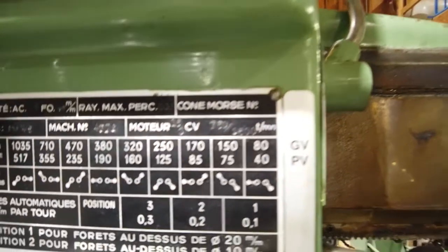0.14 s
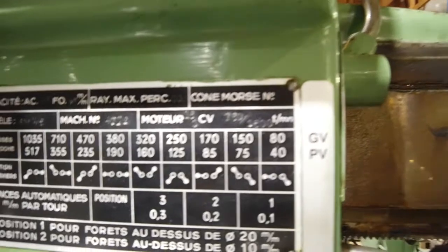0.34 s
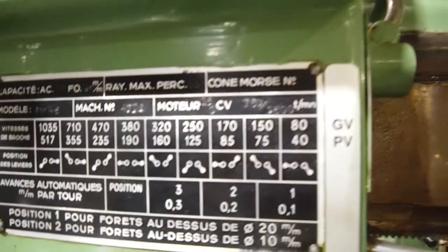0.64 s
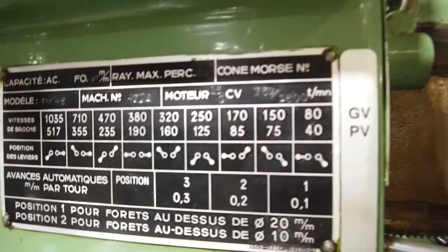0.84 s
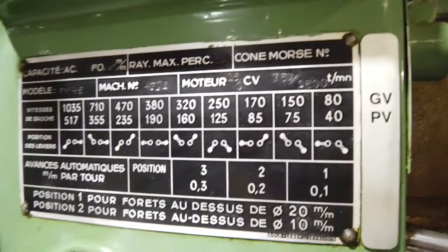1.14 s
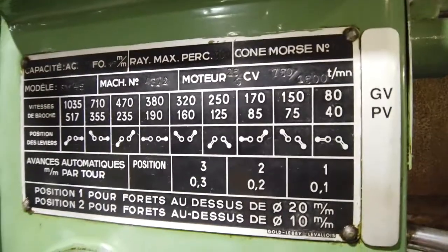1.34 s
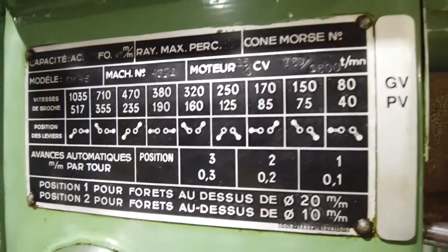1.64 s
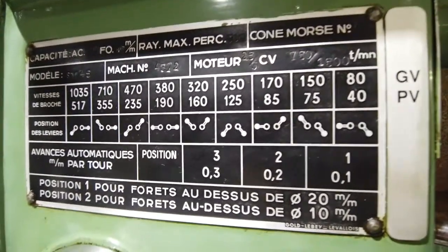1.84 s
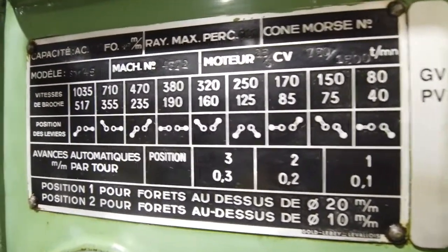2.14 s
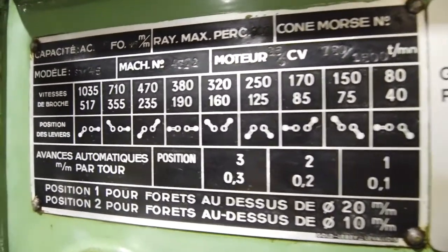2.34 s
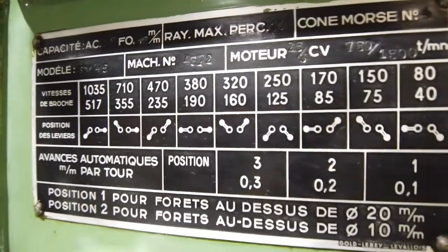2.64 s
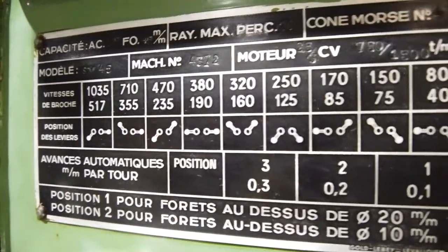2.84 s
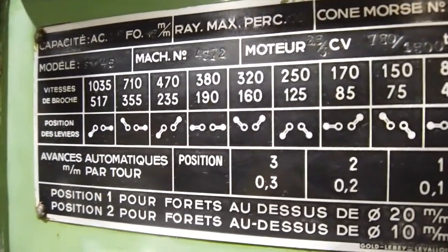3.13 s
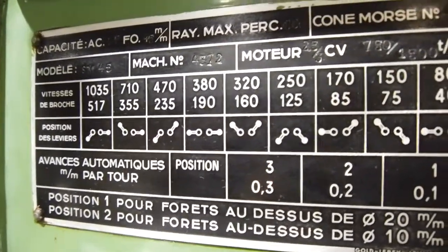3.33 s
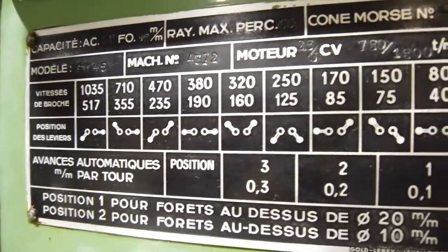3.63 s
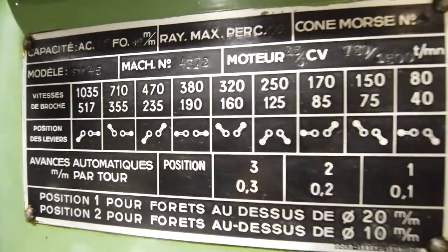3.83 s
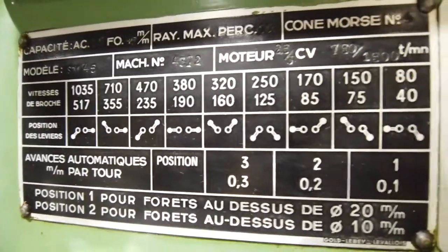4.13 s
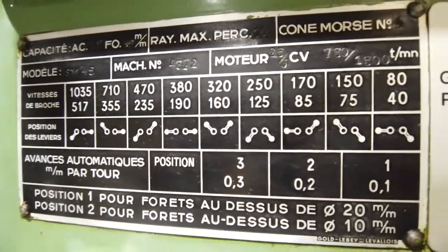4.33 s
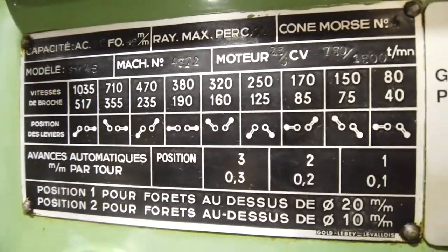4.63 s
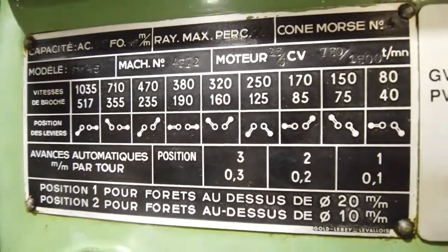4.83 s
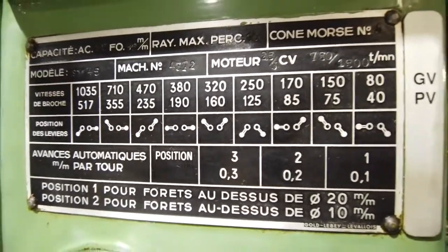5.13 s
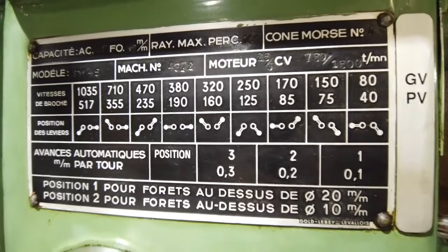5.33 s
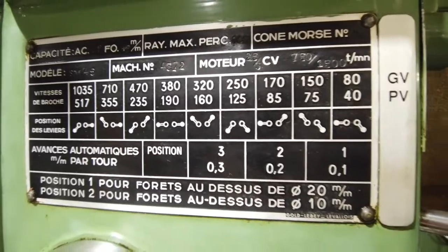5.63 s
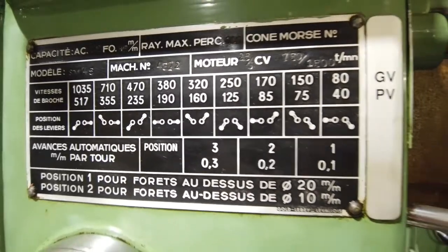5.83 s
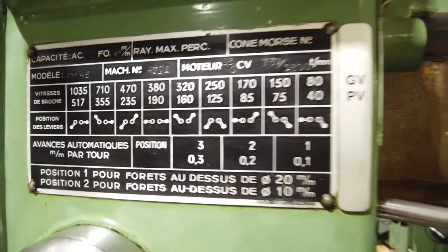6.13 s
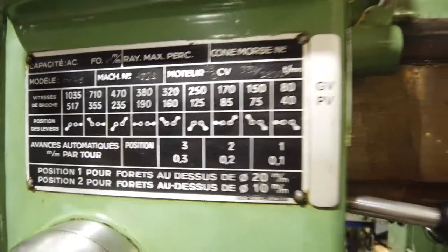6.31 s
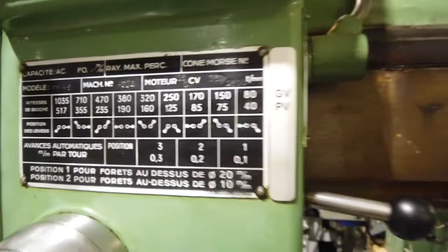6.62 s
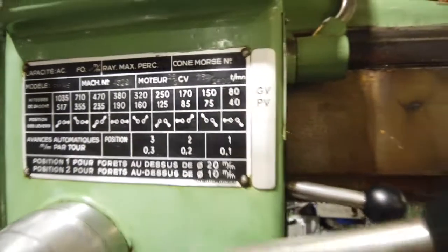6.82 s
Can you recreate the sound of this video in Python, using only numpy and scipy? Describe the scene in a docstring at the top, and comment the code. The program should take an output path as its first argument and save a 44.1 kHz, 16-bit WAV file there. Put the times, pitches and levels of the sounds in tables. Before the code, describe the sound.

A large drill's motor and gearbox idle with a steady whine, light gear clatter and a low hum in a machine shop.

```python
"""A machine shop, close to the head of an idling radial drill; a two-port stereo microphone drifts
from beside the head to its front and part way back. The motor pinion's meshing teeth whine on top.
Loose gear teeth clatter in the cast housing in time with the shafts, the bearings ring and fizz,
and a dry spot squeaks. Underneath, a resonance of the arm throbs unevenly, about five times
a second, over the rumble of the hall."""
import sys
import numpy as np
from scipy import signal
from scipy.fft import rfft, irfft, next_fast_len
from scipy.io import wavfile
from scipy.ndimage import uniform_filter1d

SR = 44100
rng = np.random.default_rng(int(sys.argv[2]) if len(sys.argv) > 2 else 0)


def bounce(signal):
    """Save signal as a 16-bit WAV file at the path given by the first command-line argument."""
    frames = np.transpose(np.atleast_2d(signal))
    limited = np.clip(frames, -1, 1)
    pcm = np.round(limited * 32767).astype(np.int16)
    wavfile.write(sys.argv[1], SR, pcm)


N = 307377
T = np.arange(N) / SR
COARSE_T = T[::64]
FFT_SIZE = next_fast_len(N)
BINS = np.fft.rfftfreq(FFT_SIZE, 1 / SR)

MOTOR_HZ, COUNTERSHAFT_HZ, SPINDLE_HZ = 24.755, 22.25, 2.949
SLOW_SHAFT_HZ, IDLER_HZ = MOTOR_HZ / 5, MOTOR_HZ / 10

# The microphone's path round the head: (time [s], position [0 beside, 1 in front])
MIC_PATH = [(0, 0.03), (1.9, 0.18), (2.6, 0.53), (3.1, 0.9), (4.1, 1), (4.7, 0.64), (5.6, 0.39),
            (6.97, 0.37)]
# How its two ports relate: (frequency [Hz], likeness [0-1], left lead [rad])
MIC_PORTS = [(30, .95, 0), (200, .97, 0), (280, .94, 0), (420, .985, 0), (510, .94, 0), (700, .975, 0),
             (1180, .935, -.05), (1340, .98, -.05), (1700, .93, 0), (2050, .965, .05), (2380, .75, .1),
             (2500, .87, .1), (2680, .6, 0), (3000, .28, -.5), (3300, .2, 2.2), (3500, .7, 3),
             (3850, .78, 3.1), (4700, .15, 3.3), (5500, .68, 4.6), (6400, .25, 5.7), (7400, .25, 4.6),
             (9000, .25, 6.1), (13000, .25, 9.3)]
# Relative pickup of the gearing along that path:
# (time [s], whine [dB], low housing modes [dB], high housing modes [dB], wheels [dB], covers [dB])
GEAR_PICKUP = [(0, -28.5, -33.5, -32, -28.5, -38.5), (0.6, -30, -34.5, -33.5, -30, -41),
               (0.88, -29.5, -35, -34, -28, -39), (1.05, -29.5, -35, -33, -33, -41.5),
               (1.2, -29.0, -34.5, -34, -29.5, -42), (2.0, -29.5, -34.5, -34.5, -31, -44.5),
               (2.55, -29, -34.5, -35, -31, -43), (2.95, -30.5, -36.5, -32, -32, -42.5),
               (3.15, -29, -35.5, -34, -31, -38), (3.35, -29.5, -34, -33, -32.5, -42),
               (3.8, -29, -35.5, -33.5, -32.5, -38.5), (4.0, -29, -35.5, -35, -31, -39.5),
               (4.15, -30, -35.5, -34, -29, -44), (4.65, -30.5, -36, -34, -33, -43.5),
               (5.05, -31, -34.5, -35.5, -32.0, -43), (5.65, -30.5, -35.5, -36.5, -31.5, -45),
               (6.3, -32.5, -36.5, -37, -32.5, -46.5), (6.97, -33.5, -38, -44, -35, -44.5)]
# Relative pickup of the bearings: (time [s], races [dB], rings [dB], fizz [dB])
BEARING_PICKUP = [(0.0, -40, -47.5, -49.5), (0.6, -43, -48.5, -51), (0.75, -45.5, -46, -52),
                  (1.2, -47, -49.5, -53), (1.4, -46.5, -54, -48.5), (1.6, -45, -48.5, -53),
                  (1.75, -46.5, -53, -49), (2.0, -48.5, -50.5, -53), (2.2, -47, -55.5, -53),
                  (2.35, -45, -47, -48.5), (2.55, -48.5, -53.5, -52.5), (3.55, -50.5, -54, -54.5),
                  (3.95, -50, -51.5, -54.5), (4.15, -50.5, -56, -54.5), (5.1, -49, -55, -54.5),
                  (5.3, -47.5, -57, -54.5), (5.9, -48.5, -53.5, -54), (6.45, -46.5, -52, -52),
                  (6.97, -48.5, -52, -52.5)]
# Spectra of hall rumble, the microphone's own hiss and bearing fizz: (frequency [Hz], relative level [dB])
RUMBLE_SPECTRUM = [(10, 2), (30, 2), (58, -10), (100, 3), (150, 0.5), (200, -1), (265, -8), (350, -2),
                   (600, -11), (1200, -26), (4000, -32)]
MIC_HISS_SPECTRUM = [(3000, -21), (6500, 2.5), (8000, -14), (11000, 4.5), (13500, -0.5)]
FIZZ_SPECTRUM = [(3710, -11), (6000, 1.5), (6450, -31), (6990, 2), (7350, 3.5), (7900, -2), (8700, 3.5),
                 (9100, 0), (10400, -3), (11200, -1.5), (13100, -3), (14000, -10)]
# Throbs of the arm: (time [s], relative peak [dB], half length [s])
ARM_THROBS = [(0.146, -45, .06), (.39, -38.5, .06), (.52, -41, 0.027), (.69, -43, 0.027),
              (0.872, -39.5, 0.065), (1.095, -37, .04), (1.27, -42, 0.064), (1.51, -37, 0.087),
              (1.684, -36.5, 0.066), (1.895, -32.5, 0.042), (2.09, -33.5, 0.059), (2.228, -34, 0.045),
              (2.31, -36, .055), (2.487, -35, 0.029), (2.708, -35, 0.045), (2.876, -40, 0.043),
              (3.026, -43, .025), (3.134, -38.5, 0.059), (3.243, -44, .03), (3.41, -43, .04),
              (3.66, -42, 0.028), (3.84, -42, 0.048), (4.07, -39, 0.048), (4.243, -37, .035),
              (4.42, -42, 0.027), (4.53, -42, .02), (4.662, -33.5, 0.047), (4.86, -38, .05),
              (5.0, -49, 0.042), (5.2, -40, .025), (5.36, -39, .025), (5.452, -39.5, .04),
              (5.852, -38, 0.049), (6.2, -32, 0.036), (6.398, -38.5, 0.062), (6.498, -39, .035),
              (6.6, -33, 0.049), (6.744, -40, .04), (6.838, -40, .03)]
# Grit scraping in the bearings: (time [s], fizz boost [dB])
GRIT_SCRAPES = [(.08, 5), (.16, 2.5), (.195, 5), (.24, 4), (.73, 4), (1.35, 3), (1.7, 1.5), (3.42, -1),
                (4.04, 4), (4.755, 6), (6.2, 5), (6.91, 3)]
# The highest bearing resonance at the microphone: (time [s], level [dB])
SINGING_LEVEL = [(0, -78), (1.0, -61), (1.5, -58), (2.35, -57), (2.6, -69), (6.97, -65)]
# Resonances of the bearing races, their thin rings, the cast housing, gear wheels and thin covers:
# (frequency [Hz], half width [Hz], weight from beside [dB], weight from in front [dB])
RACE_MODES = [(3080, 160, 8, -9), (3234, 33, 7, 8), (3458, 160, -3.5, 6.5), (3580, 150, -3.5, -6),
              (4400, 570, -12.5, -7)]
RING_MODES = [(5340, 51, 14.5, 2), (5350, 210, 6, -1), (5530, 36, 11.5, 10.5), (5660, 92, 9, 2),
              (6050, 74, -11, -2), (6810, 40, -22, 3.5)]
HOUSING_MODES = [(312, 9.7, -5.5, -17), (401, 52, -9, -10.5), (489.7, 14.5, -5.5, -10), (633, 40, -12, -8),
                 (722, 52, -6.5, -7.5), (852, 104, -2, -3.5), (1026, 45, 1.5, -3.5), (1133, 12.3, 7.5, 1),
                 (1236, 136, 3, -3), (1325, 50, 5.5, -0.5), (1425, 66, 1, -1.5), (1600, 250, -6, -11.5)]
WHEEL_MODES = [(1790, 110, -2, -8.5), (1914, 100, 1, -6.5), (2054, 44, 6, 5), (2163, 113, -1, 0),
               (2330, 154, -13, -3.5)]
COVER_MODES = [(2485, 42, 3.5, 2.5), (2567, 96, -7.5, -1), (2640, 45, -6, -6), (2740, 41, -20, -4),
               (2836, 58, -3.5, -1.5), (2965, 37, -4, -0.5)]
# Squeaks of a dry spot in the drive: (time [s], peak [dB])
DRY_SQUEAKS = [(.644, -34), (.785, -24), (.937, -28), (1.55, -29), (2.727, -25), (3.342, -29.5),
               (3.537, -31), (5.073, -26), (5.392, -30), (5.6, -32), (6.28, -27)]
# Steady tones of the other gears and shafts, and two thin high tones of the bearing rings: (frequency [Hz],
# relative level [dB])
GEAR_TONES = [(48.2, -58), (70.9, -49.5), (114.1, -49), (177.2, -62), (241, -59), (353.6, -59.5),
              (430, -57.5), (623.8, -52.5), (690.2, -56), (725.8, -59), (782.4, -53), (1225.8, -45),
              (1247.6, -58), (1320.4, -48), (1367.4, -57), (1619.7, -52), (2116.6, -45), (2159.5, -47.5),
              (2289.8, -59), (5526, -71), (5573, -73)]
# The feed gears' tone as the microphone crosses its standing waves: (time [s], level [dB])
FEED_LEVEL = [(0, -56), (.6, -51), (1.1, -48), (2.4, -50), (4, -52), (5.2, -51.5), (6.2, -49), (6.7, -57)]
# Hardest growls of the casting: (time [s], boost [dB])
HOUSING_GROWLS = [(.55, 4.5), (.95, 6), (1.88, 4), (4.22, 3)]
# Bunches of loose-tooth clatter: (time [s], boost [dB])
TOOTH_RATTLES = [(.61, 4), (.87, -1.5), (1.2, 4.5), (1.55, 4), (1.88, 5), (2.06, 4), (3.12, 2), (4.26, 1),
                 (5.37, 1), (6.17, 2.5)]
# Single hard knocks of a loose tooth: (time [s], peak [dB])
TOOTH_KNOCKS = [(.046, -26), (.159, -11), (.385, -20), (.611, -17), (.872, -15), (1.176, -16), (1.202, -16),
                (1.214, -20), (2.306, -20), (2.335, -23), (2.575, -22), (2.757, -22), (3.479, -16.5),
                (3.838, -16), (4.113, -16), (4.143, -14), (4.566, -16), (4.916, -22), (5.017, -20),
                (5.37, -25), (5.583, -24), (5.695, -16), (6.134, -18), (6.171, -22), (6.86, -20),
                (6.901, -21)]
# Partials of the pinion, loudest at its tooth count: (order [multiple of motor speed],
# relative level [dB], change in front [dB], throb depth [0-1], left lead [rad])
PINION_ORDERS = [(12, -28.5, 0, 0, .65), (24, -13, -3, .38, .5), (34, -22, 0, 0, .22), (35, -25, 0, 0, .2),
                 (36, .7, 0, 0, .08), (48, -25, -2, 0, .6), (60, -22.5, 0, 0, .2),
                 (120, -23.5, 1.5, 0, 1.5)]


def gain_of(db):
    """Decibels to amplitude."""
    return np.exp(np.asarray(db) * np.log(10) / 20)


def unit_rms(x):
    """Scales to rms 1."""
    return x / np.sqrt(np.mean(abs(x) ** 2) + 1e-20)


def level(curve, column=1):
    """A dB column of a time curve as a gain for each sample."""
    rows = np.array(curve)
    return gain_of(np.interp(T, rows[:, 0], rows[:, column]))


def at_bins(points, column=1):
    """A column of a frequency table at every bin."""
    rows = np.array(points)
    return np.interp(np.log(BINS + 1), np.log(rows[:, 0] + 1), rows[:, column])


def wander(rate_hz, size=4096):
    """Random drift of rms 1, no faster than about rate_hz."""
    hz = np.arange(size // 2 + 1) / T[-1]
    spectrum = rfft(rng.standard_normal(size)) / (1 + (hz / rate_hz) ** 4)
    return np.interp(T, np.linspace(0, T[-1], size), unit_rms(irfft(spectrum)))


def throb(hz, peak_s, depth):
    """A periodic swing about 1, as when an off-centre wheel presses harder once a turn."""
    return 1 + depth * np.cos(2 * np.pi * hz * (T - peak_s))


def surges(events, half_length_s):
    """A gain that moves briefly by each event's boost."""
    boost_db = sum(db * np.exp(-((COARSE_T - at) / half_length_s) ** 2) for at, db in events)
    return gain_of(np.interp(T, COARSE_T, boost_db))


def impacts(per_s, rub, repeat):
    """Two forces of tiny blows over smooth rubbing; a share recurs every two turns of the slow shaft."""
    blows = unit_rms(rng.standard_normal((2, N)) * (rng.random((2, N)) < per_s / SR))
    fresh = unit_rms(blows + rub * rng.standard_normal((2, N)))
    worn = fresh[:, np.arange(N) % round(2 * SR / SLOW_SHAFT_HZ)]
    return np.sqrt(1 - repeat) * fresh[:, ::-1] + np.sqrt(repeat) * unit_rms(worn)


def mic_position():
    """Where the microphone is at each sample: 0 beside the head, 1 close in front."""
    return np.interp(T, *np.transpose(MIC_PATH))


def at_ports(turns, lead_rad):
    """A sine of rms 1 that reaches the left port lead_rad before the right."""
    return np.sqrt(2) * np.sin(2 * np.pi * turns + np.array([[.5], [-.5]]) * lead_rad)


def resonances(modes, column=2):
    """Gain at every bin of a body with steep-sided resonances."""
    peaks = (gain_of(row[column]) / (1 + ((BINS - row[0]) / row[1]) ** 2) for row in modes)
    return np.sqrt(sum(peak ** 2 for peak in peaks))


def radiate(force, gain, ripple_db=3.0, smooth_hz=7000):
    """Colours two unrelated forces and spreads them over the two ports, at rms 1."""
    # Iron's countless close modes ripple the response every few tens of Hz and merge in the treble.
    ripple = uniform_filter1d(rng.standard_normal(len(BINS)), size=130)
    ripple = unit_rms(uniform_filter1d(ripple, size=130))
    depth_db = ripple_db * BINS / (BINS + 500) / np.hypot(1, BINS / smooth_hz)
    first, second = rfft(force, FFT_SIZE, axis=1) * gain * gain_of(depth_db * ripple)
    likeness = at_bins(MIC_PORTS)
    lead = np.exp(.5j * at_bins(MIC_PORTS, column=2))
    mid, side = first * np.sqrt(1 + likeness), second * np.sqrt(1 - likeness)
    ports = np.array([(mid + side) * lead, (mid - side) / lead])
    return unit_rms(irfft(ports, FFT_SIZE, axis=1)[:, :N])


def ring(force, modes, band=1):
    """A body rings; its modes change weight as the microphone moves from its side to its front."""
    beside = radiate(force, band * resonances(modes, column=2))
    front = radiate(force, band * resonances(modes, column=3))
    return beside + mic_position() * (front - beside)


def mic_hiss(hiss_db=-61, flicker_db=3.5):
    """The microphone's own faint, flickering hiss."""
    gain = gain_of(hiss_db + flicker_db * wander(25))
    return gain * radiate(rng.standard_normal((2, N)), gain_of(at_bins(MIC_HISS_SPECTRUM)))


def hall_rumble(rumble_db=-49):
    """The hall's dull rumble behind the drill."""
    return gain_of(rumble_db) * radiate(rng.standard_normal((2, N)), gain_of(at_bins(RUMBLE_SPECTRUM)))


def arm_drone(hz=118.9, stray_hz=5, floor_db=-48, trim_db=-1.5, flicker_db=2.0):
    """The arm's low resonance is shaken into throbs; its pitch strays when weak and holds when strong."""
    power = sum(gain_of(db) ** 2 * np.exp(-2 * ((COARSE_T - at) / half_s) ** 2)
                for at, db, half_s in ARM_THROBS)
    swell = np.interp(T, COARSE_T, np.sqrt(power + gain_of(floor_db) ** 2))
    pitch_hz = hz + stray_hz * np.sqrt(gain_of(floor_db) / swell) * wander(10.7)
    hum = at_ports(np.cumsum(pitch_hz) / SR, lead_rad=.03)
    return gain_of(trim_db + flicker_db * wander(33)) * swell * hum


def bearing_fizz(trim_db=-1.35, flicker_db=1.4, dull_hz=11000):
    """The bearings' fine fizz pulses three and five times to a turn of the idler and flares on grit."""
    load = throb(3 * IDLER_HZ, .049, depth=.087) * throb(5 * IDLER_HZ, .003, depth=.12)
    colour = gain_of(at_bins(FIZZ_SPECTRUM)) / np.sqrt(1 + (BINS / dull_hz) ** 6)
    force = impacts(per_s=6200, rub=1.9, repeat=.092) * load
    grains = radiate(force, colour) * surges(GRIT_SCRAPES, half_length_s=.019)
    return gain_of(trim_db + flicker_db * wander(23)) * level(BEARING_PICKUP, column=3) * grains


def bearing_song(hz=7230, half_width_hz=85):
    """One thin, high bearing resonance sings out, pressed five times to a turn of the idler."""
    force = impacts(per_s=1500, rub=.8, repeat=.2) * throb(5 * IDLER_HZ, .012, depth=.46)
    return level(SINGING_LEVEL) * radiate(force, resonances([(hz, half_width_hz, 0)]))


def bearing_ring(rings_db=-.14, flicker_db=1.82, spot_at_s=.384, spot_db=2, spot_half_s=.026):
    """Rolling contact rings the races and their thin rings; a rough spot returns with each idler turn."""
    from_spot_s = (((T - spot_at_s) * IDLER_HZ + .5) % 1 - .5) / IDLER_HZ
    rough_spot = gain_of(spot_db * np.exp(-(from_spot_s / spot_half_s) ** 2))
    race_force = impacts(per_s=2500, rub=.31, repeat=.48) * throb(5 * IDLER_HZ, .023, depth=.14)
    races = level(BEARING_PICKUP) * ring(race_force, RACE_MODES)
    ring_force = impacts(per_s=2700, rub=.99, repeat=.23) * throb(5 * IDLER_HZ, .061, depth=.12)
    rings = level(BEARING_PICKUP, column=2) * ring(ring_force * rough_spot, RING_MODES)
    return gain_of(flicker_db * wander(21)) * (races + gain_of(rings_db) * rings)


def squeaks(hz=1142, half_length_s=.012):
    """A dry spot briefly excites one sharp resonance of the housing, alike at both ports."""
    swell = sum(gain_of(db) * np.exp(-((COARSE_T - at) / half_length_s) ** 2) for at, db in DRY_SQUEAKS)
    return np.interp(T, COARSE_T, swell) * np.sin(2 * np.pi * (hz * T + rng.random()))


def gear_tones(trim_db=-2.5, fade_db=-1.0, jitter=.00039, beating_hz=311.8, beating_db=-14.5,
               feed_hz=538.5):
    """Weaker gears hum; high tones fade as the microphone crosses standing waves, and a low one beats."""
    clock = T + np.cumsum(jitter * wander(11)) / SR
    fades_db = [fade_db * wander(.8) for _ in range(4)]
    tones = 0
    for k, (hz, db) in enumerate(GEAR_TONES):
        gain = gain_of(trim_db + db + fades_db[k % 4] * hz / (hz + 500))
        tones += gain * np.sqrt(2) * np.sin(2 * np.pi * (hz * clock + rng.random()))
    beating = throb(hz=.535, peak_s=.5, depth=.51) * at_ports(beating_hz * clock, lead_rad=.25)
    feed = level(FEED_LEVEL) * at_ports(feed_hz * clock, lead_rad=0)
    return tones + gain_of(beating_db) * level(GEAR_PICKUP, column=2) * beating + feed


def housing_growl(low_db=1.1, high_db=.5, split_hz=950):
    """Dense tooth blows make the casting growl, a little harder three times to a turn of the spindle."""
    load = throb(3 * SPINDLE_HZ, .057, depth=.067)
    high_share = 1 / (1 + (split_hz / (BINS + 1)) ** 12)
    low = ring(impacts(per_s=2400, rub=.7, repeat=.47), HOUSING_MODES, np.sqrt(1 - high_share))
    low *= gain_of(low_db) * level(GEAR_PICKUP, column=2)
    high = ring(impacts(per_s=2000, rub=.63, repeat=.61), HOUSING_MODES, np.sqrt(high_share))
    high *= gain_of(high_db) * level(GEAR_PICKUP, column=3)
    return load * (low + high * surges(HOUSING_GROWLS, half_length_s=.029))


def tooth_knocks(decay_s=.003, onset_s=.00076, spread_db=2):
    """A loose tooth lands hard and the wheels ring together for a few milliseconds."""
    t = np.arange(SR // 25) / SR
    envelope = np.exp(-t / decay_s) * (1 - np.exp(-(t / onset_s) ** 2))
    out = np.zeros((2, N))
    for at, peak_db in TOOTH_KNOCKS:
        wheels = sum(gain_of(rng.normal(beside_db, spread_db)) * at_ports(hz * t, lead_rad=.1)
                     for hz, _, beside_db, _ in WHEEL_MODES)
        knock = wheels * envelope
        slot = out[:, round(at * SR):][:, :len(t)]
        slot += gain_of(peak_db) * knock[:, :slot.shape[1]] / abs(knock).max()
    return out


def backlash_clatter(mesh_hz=345.16, wheels_db=.14, covers_db=.47, flicker_db=.33):
    """Loose teeth of the slow mesh knock in bunches as the shafts turn, ringing wheels and covers."""
    layshaft_hz = 9 * SPINDLE_HZ
    load = throb(mesh_hz, .0013, depth=.43) * throb(COUNTERSHAFT_HZ, .02, depth=.058)
    load *= throb(layshaft_hz, .01, depth=.14) * throb(3 * layshaft_hz, .01, depth=.08)
    slack = throb(SPINDLE_HZ, .13, depth=.027) * throb(3 * SPINDLE_HZ, .065, depth=.074)
    slack *= surges(TOOTH_RATTLES, half_length_s=.028)
    wheel_force = impacts(per_s=1600, rub=.76, repeat=.19) * load * slack
    wheel_force *= gain_of(flicker_db * wander(11))
    wheels = gain_of(wheels_db) * level(GEAR_PICKUP, column=4) * ring(wheel_force, WHEEL_MODES)
    cover_force = impacts(per_s=1300, rub=.48, repeat=.16) * load
    covers = gain_of(covers_db) * level(GEAR_PICKUP, column=5) * ring(cover_force, COVER_MODES)
    return wheels + covers


def pinion_whine(jitter=.00039, flutter=.066, unevenness=.25):
    """The motor pinion's teeth mesh, close up; the slow shaft's load rocks their speed and strength."""
    speed_hz = MOTOR_HZ * (throb(SLOW_SHAFT_HZ, .063, depth=.0012) + jitter * wander(26))
    turns = np.cumsum(speed_hz) / SR
    position = mic_position()
    rock = np.cos(2 * np.pi * 3 * SLOW_SHAFT_HZ * (T - .081)) + unevenness * wander(30)
    partials = 0
    for order, db, front_db, depth, lead_rad in PINION_ORDERS:
        gain = gain_of(db + front_db * position) * (1 + depth * rock)
        partials += gain * at_ports(order * turns + rng.random(), lead_rad)
    load = throb(SLOW_SHAFT_HZ, .021, depth=.062) + flutter * wander(30)
    return level(GEAR_PICKUP) * load * partials


def scene():
    """The drill at the microphone: tones and drone near the middle, noises spread over both ports."""
    tones = pinion_whine() + gear_tones() + arm_drone()
    teeth = housing_growl() + backlash_clatter() + tooth_knocks()
    bearings = bearing_ring() + bearing_song() + bearing_fizz()
    return tones + teeth + bearings + squeaks() + hall_rumble() + mic_hiss()


def record(dry):
    """The recorder cuts the top treble steeply."""
    lowpass = signal.firwin(255, cutoff=13900, window=("kaiser", 9), fs=SR)
    return signal.oaconvolve(dry, lowpass[None], "same", axes=1)


dry = scene()
out = record(dry)
bounce(out)
```